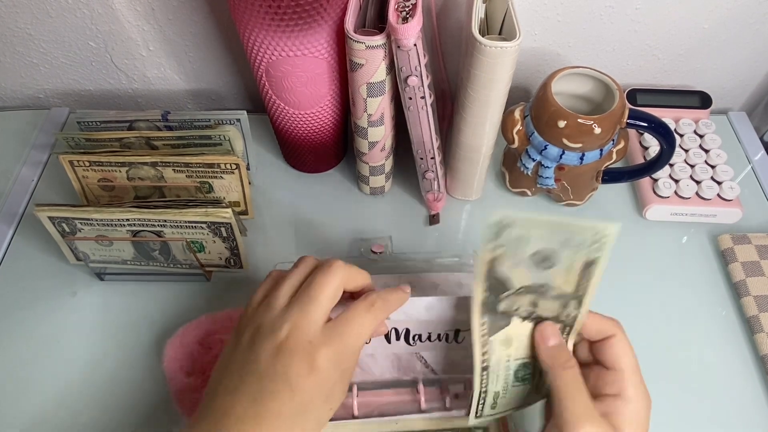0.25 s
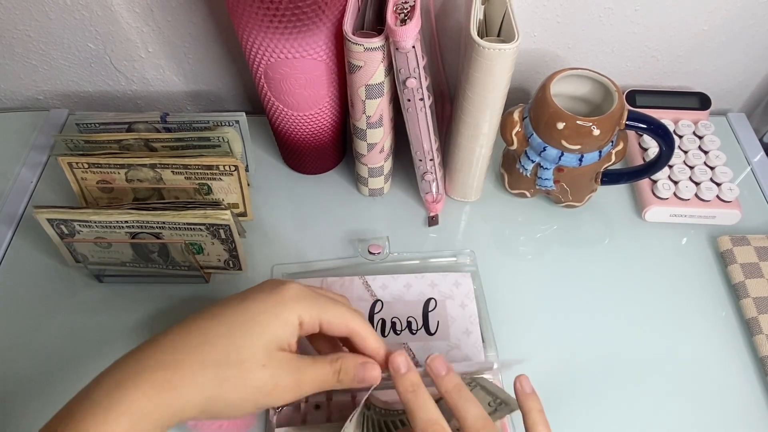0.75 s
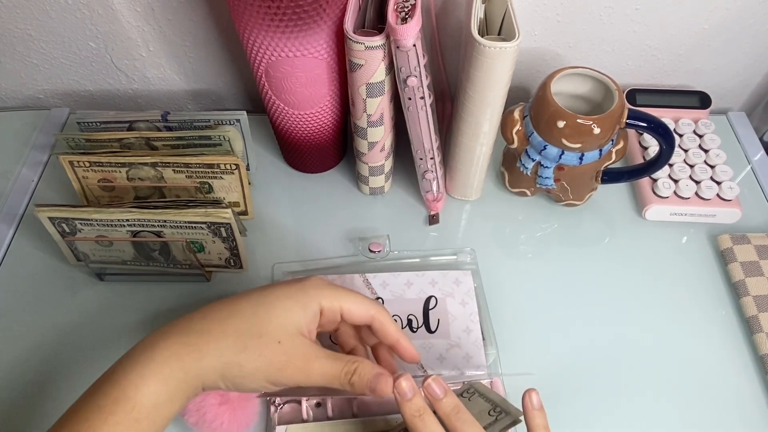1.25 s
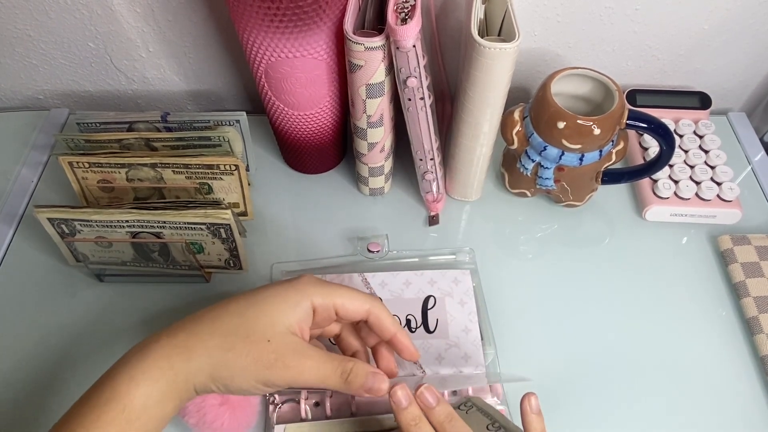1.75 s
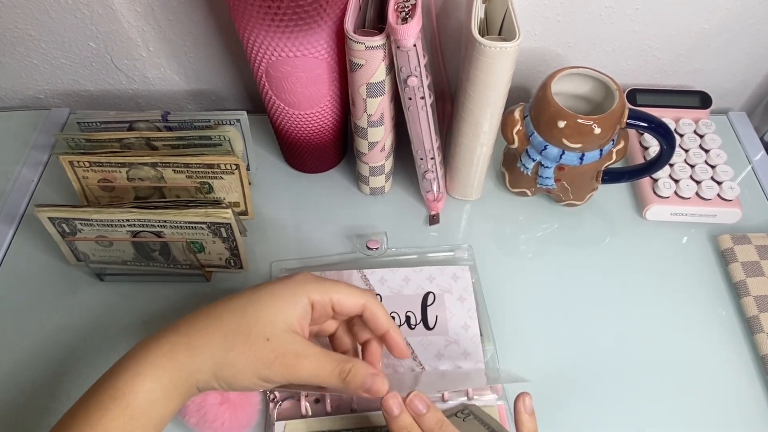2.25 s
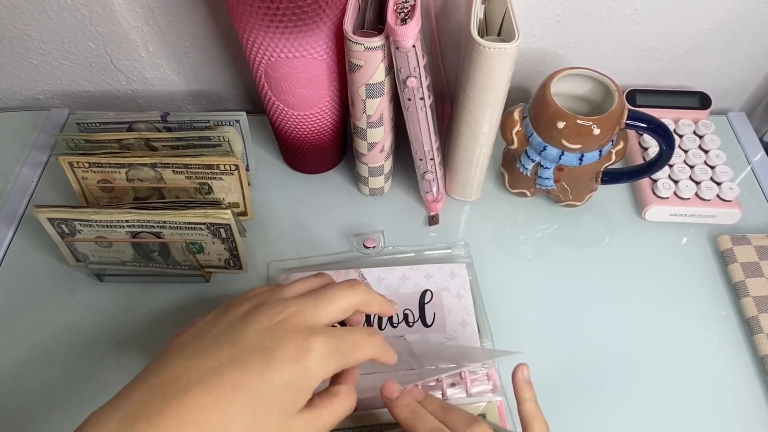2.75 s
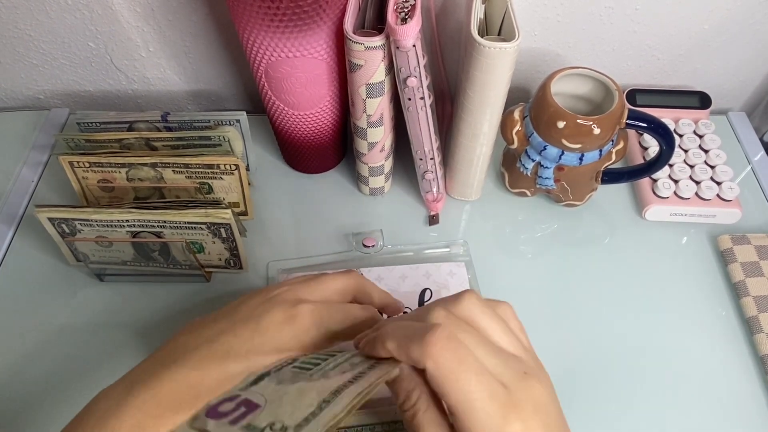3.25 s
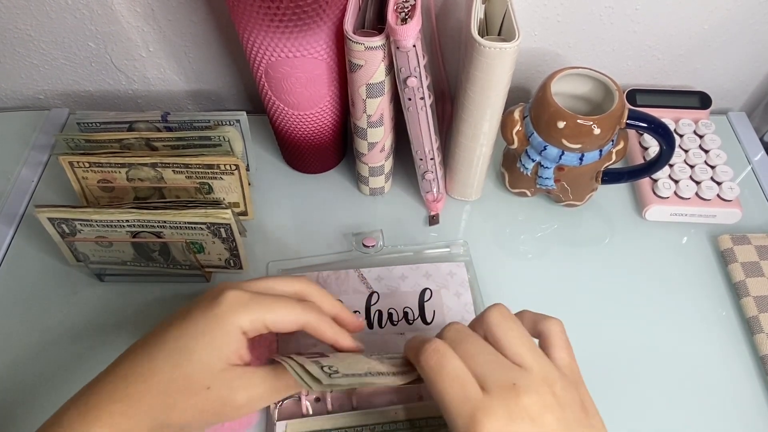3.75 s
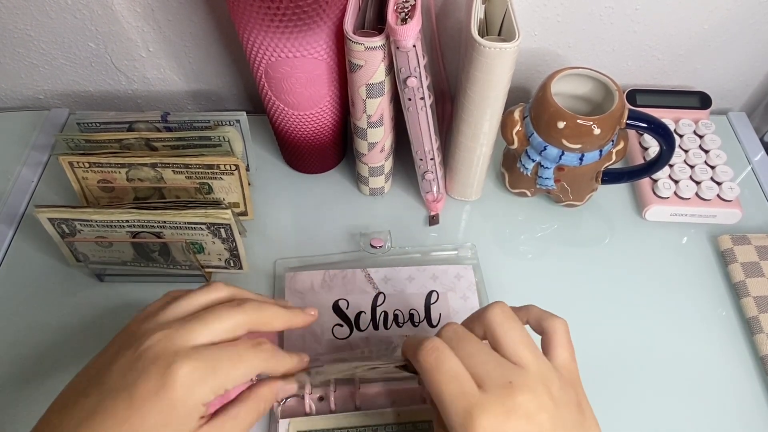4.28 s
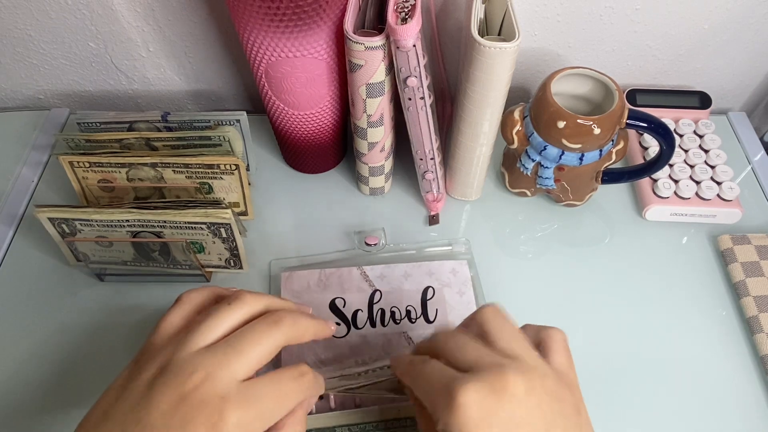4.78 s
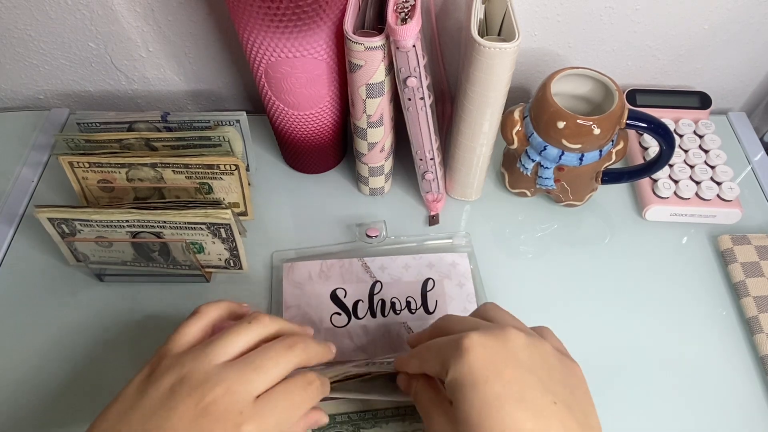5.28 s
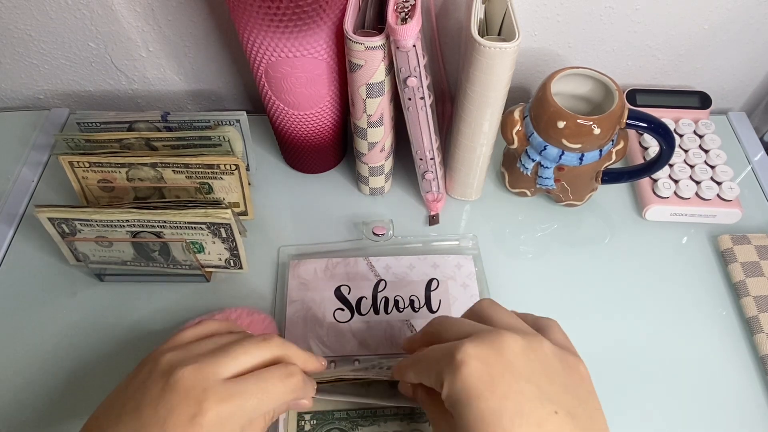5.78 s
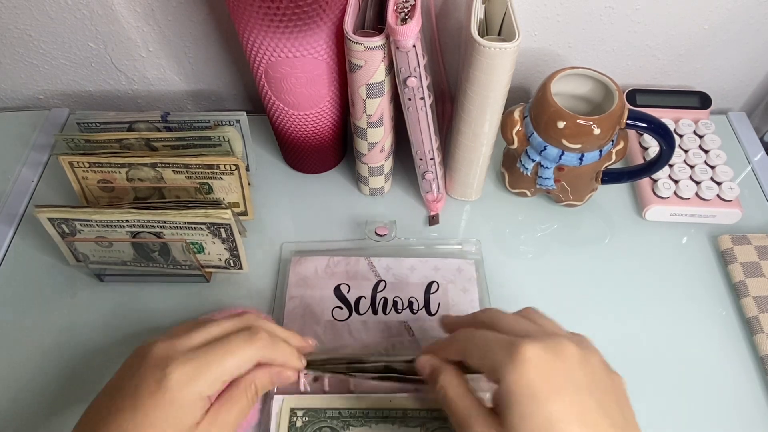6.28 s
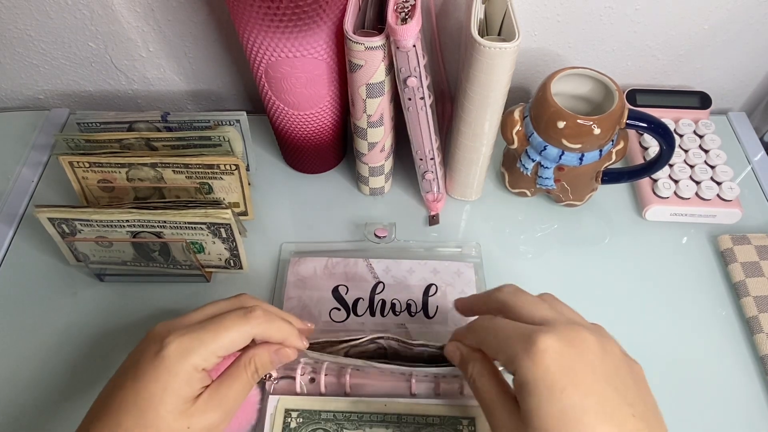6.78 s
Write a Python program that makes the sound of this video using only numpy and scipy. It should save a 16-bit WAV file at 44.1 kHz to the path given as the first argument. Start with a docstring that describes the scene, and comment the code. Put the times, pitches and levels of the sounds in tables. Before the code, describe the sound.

Paper banknotes and a stiff plastic binder pouch are handled softly, close to the microphone, over the steady low rumble of a small room. Light rubbing and a couple of dull bumps open the sound, followed by a crisp flurry of crinkling and sliding paper from about 0.5 to 1 second. It then goes quieter, with only faint ticks and rubs, until a click and a knock on the desk at around 2.5 seconds. Rustling builds again, with a bright snap near 3.4 seconds and a hissing slide of paper until about 4. Scattered crinkles lead to sharp clicks and taps at around 4.8 seconds, then gentle rubbing. From about 5.8 to 6.6 seconds the pouch crackles repeatedly while the binder knocks dully on the desk. A faint rustle closes it at around 7 seconds.

```python
"""Over the low rumble of a small room, paper rubs and hisses: hands slide banknotes into the stiff
plastic pouch of a ring binder on a glass desk. Sheet-on-sheet friction is noise and tiny slips,
coloured by paper and pouch. Creases snap in short bursts. Fingers and pouch jolt the binder, which
knocks dully on the desk. Two microphone ports above the desk hear it, differing in phase and level."""
import sys
import numpy as np
from scipy import signal
from scipy.fft import rfft, irfft, next_fast_len
from scipy.io import wavfile

SR = 44100
rng = np.random.default_rng(int(sys.argv[2]) if len(sys.argv) > 2 else 0)


def file_out(sig):
    """Save sig as 16-bit WAV at sys.argv[1]."""
    # one column per channel
    cols = np.atleast_2d(sig).T
    # limit, then scale
    lim = np.clip(cols, -1, 1)
    pcm = np.round(lim * 32767).astype(np.int16)
    wavfile.write(sys.argv[1], SR, pcm)


N = 310023

# Building rumble. Each row: frequency in Hz, relative spectral density in dB.
RUMBLE_SPECTRUM = [(15, -35), (28, -12.5), (45, -5), (66, 4.5), (85, 0), (130, -1), (165, -18.5),
                   (225, -17), (300, -31.5), (1100, -40.5), (1400, -103.5), (4500, -61.5), (9500, -59.5),
                   (13000, -98), (16000, -93.5)]
# Strokes of sheet on sheet. Each row: time of full pressure in seconds, swell in seconds,
# hold in seconds, scrape level in dB, hiss over scrape in dB, open pocket's resonance in Hz.
SHEET_STROKES = [(0.018, 0.018, 0.023, -54.5, -4, 1270), (0.097, 0.067, .03, -59, -11, 1260),
                 (0.188, 0.052, .04, -61, -14, 2260), (0.3, 0.15, 0.12, -59, -12.5, 1200),
                 (0.465, 0.2, 0.089, -58, 6.5, 3500), (0.542, 0.058, 0.11, -52.5, 2, 2930),
                 (0.645, 0.036, 0.086, -54, -3.5, 2920), (0.751, 0.057, 0.045, -57, -11, 1100),
                 (0.854, 0.11, 0.061, -68.5, -2, 2400), (0.994, 0.0092, .015, -57.5, -4, 2480),
                 (1.127, 0.027, 0.035, -70, 0, 1010), (1.275, 0.068, 0.1, -66.5, -9, 2090),
                 (1.468, 0.032, 0.019, -76.5, 0, 1900), (1.672, 0.11, 0.025, -65, -14.5, 1000),
                 (1.793, 0.015, 0.013, -64.5, -14.5, 1040), (1.87, 0.027, 0.014, -67, -19, 1210),
                 (2.059, 0.0084, 0.0067, -57, -9.5, 1080), (2.182, 0.02, 0.0084, -61.5, -13, 1100),
                 (2.252, 0.018, 0.0061, -66.5, -1.5, 1230), (2.372, 0.023, 0.035, -65.5, -10.5, 1270),
                 (2.434, 0.011, 0.0083, -43.5, -7, 1070), (2.648, 0.1, 0.041, -59, -11.5, 1090),
                 (2.768, 0.088, 0.014, -54, -10.5, 1150), (2.889, 0.047, 0.1, -53.5, -6, 2310),
                 (3.017, 0.039, 0.01, -51, 3.5, 3230), (3.173, 0.026, 0.11, -75, -18, 1180),
                 (3.267, .015, 0.0073, -68, 2, 3000), (3.331, 0.052, .03, -61, 9.5, 5350),
                 (3.383, 0.076, 0.091, -57, -3.5, 2660), (3.503, 0.051, 0.4, -56, 0.5, 3500),
                 (3.836, 0.11, 0.0073, -48.5, -6, 2300), (3.999, 0.02, 0.0062, -53, 2.5, 3780),
                 (4.126, 0.11, 0.049, -55.5, -2.5, 2020), (4.288, .09, .01, -50.5, -2.5, 2800),
                 (4.399, 0.023, 0.13, -67, 3.5, 2620), (4.551, 0.052, 0.054, -52, -10, 1130),
                 (4.718, 0.21, 0.015, -57, -14, 2570), (4.765, 0.0058, 0.0035, -37.5, -19, 1200),
                 (4.809, 0.013, 0.0042, -50.5, 4.5, 3000), (4.833, 0.022, 0.0027, -45, -25.5, 3010),
                 (5.072, 0.3, 0.061, -62, -3, 1180), (5.156, 0.033, 0.017, -57, -6, 1250),
                 (5.326, 0.3, 0.015, -59.5, -11.5, 3170), (5.41, 0.11, 0.17, -64, -6, 2000),
                 (5.66, 0.11, 0.12, -65, -9, 1710), (5.819, .008, 0.052, -60.5, -13, 1360),
                 (5.997, 0.13, 0.012, -57, -1.5, 1720), (6.023, 0.018, 0.053, -54.5, -20.5, 1300),
                 (6.134, 0.037, 0.047, -57.5, -4.5, 1630), (6.207, 0.053, 0.027, -42, -5.5, 1230),
                 (6.292, 0.033, 0.05, -58.5, 1, 1340), (6.393, 0.097, 0.024, -56.5, -11, 1650),
                 (6.447, .008, 0.036, -52.5, -11, 1400), (6.569, 0.0078, 0.04, -47.5, -15, 2630),
                 (6.83, 0.18, 0.035, -64.5, -0.5, 4100), (7.024, 0.036, .02, -60.5, -13, 2240)]
# Friction ranges. Each list: drag, scrape, hiss.
FRICTION_ANCHOR_HZ = [428, 1765, 7070]
FRICTION_RELEASE_DB_PER_S = [181, 269.5, 277]
FRICTION_REST_DB = [-76, -86, -87]
# Pouch resonances. Each row: centre in Hz, width in Hz, gain in dB.
POUCH_RESONANCES = [(565, 57, 8), (1182, 115, 4.5), (1660, 50, 3), (2380, 520, 9), (3540, 510, 0),
                    (4840, 190, -2.5)]
# Colour of the sheets. Each row: frequency in Hz, gain in dB.
SHEET_SPECTRUM = [(180, 16), (300, 9.5), (900, 4.5), (2500, -4.5), (5000, 2.5), (7500, 0), (10000, -2),
                  (12000, -14.5), (13500, -26), (16000, -4)]
# Snapping creases. Each row: start in seconds, level in dB, ring in Hz, crispness in dB,
# left over right in dB, decay rate in dB relative to a rate of 1 dB/ms.
CREASE_SNAPS = [(0.015, -39.5, 1300, 1, 0, 20), (0.278, -52, 850, -24, 7, 4),
                (0.298, -40.5, 830, -1, 1.5, 2), (0.307, -48, 1100, -24, 4, 3),
                (0.342, -48.5, 2380, -16, 0, 6), (0.473, -44, 3660, 17, 0, 9),
                (0.499, -33.5, 5000, -21, -1, 9), (0.505, -33.5, 2320, 4, 3, 11),
                (0.546, -25, 2830, 18, 0, 12), (0.555, -28.5, 3770, -25, 0, 12),
                (0.564, -34.5, 3700, -17, -3, 9), (0.6, -36, 2400, -9, 0, 4),
                (0.644, -20, 1170, 4.5, 0, 15.5), (0.682, -32, 1210, 2, 1, -4),
                (0.727, -34, 2940, -19, -2, 22.5), (0.901, -48, 1050, -11, 1, 4),
                (0.986, -32.5, 2480, 13, 0.5, 7), (1.106, -42, 940, 11, 2, 13),
                (1.145, -55.5, 1030, -25, 2, 7), (1.283, -55, 1230, -31, 4, 8),
                (1.342, -47.5, 1370, -7, 3, 6), (1.436, -64, 902, 3, 9, 14),
                (1.471, -50.5, 1790, -5.5, 4, 8), (1.668, -58, 1000, -18, 3, 3),
                (1.793, -58, 1070, -32, 6, 9), (1.868, -50.5, 1240, 9, 0, 10),
                (1.971, -53.5, 1340, -56, 8, 19), (2.061, -42.5, 1030, 8, 5.5, 4),
                (2.186, -57, 1050, -3, 2, 1), (2.221, -54.5, 972, 4, 0, 7),
                (2.257, -47.5, 1220, 6.5, 6.5, 0), (2.366, -51, 1280, -7, 6, 8),
                (2.424, -55, 2530, -15, -5, 5), (2.433, -37, 1480, -4, -2, 1),
                (2.46, -34.5, 1020, -24, 3, 4), (2.637, -35, 1060, 8.5, 2, 0), (2.688, -45, 1120, -6, 2, 7),
                (2.712, -46, 1110, -53, 5, 10), (2.781, -42.5, 1150, -5, 3, 4),
                (2.866, -44.5, 900, -4, -1, 8), (2.907, -46, 1060, -11, 0, 11),
                (3.021, -38, 3170, -26, -2, 4), (3.172, -46, 1120, -18, 2, 13),
                (3.235, -48.5, 1020, -42, 4, 9), (3.258, -50.5, 1110, 7, 0, -2),
                (3.312, -43, 6200, -32, 1, 11), (3.324, -39.5, 5460, 34, -13, 9),
                (3.355, -21, 5370, 13, -1, 13), (3.521, -36, 3740, -9, -5, 17),
                (3.752, -43.5, 2160, -15, 0, 6), (3.779, -42, 2290, -8, -5, 5),
                (3.841, -37, 2440, -11, -7, 9), (4.012, -40, 3650, -13, 0, 9),
                (4.129, -48, 2420, -15, -4, 7), (4.17, -51, 2080, -9, -3, 13),
                (4.397, -50.5, 2560, -19, 0, 8), (4.54, -41.5, 1270, -3, -1, 12),
                (4.67, -47.5, 2110, -5, 0, 12), (4.695, -51, 2080, -16, -10, 12),
                (4.745, -39, 3230, 2, 0, 8), (4.764, -32.5, 3160, -39, 2, 17),
                (4.768, -23.5, 1320, -55, -1, 4), (4.833, -24.5, 3100, -44, -4, 13),
                (5.152, -38.5, 1320, -9.5, 2, 7), (5.286, -47, 1600, -10, 2, 8),
                (5.322, -41.5, 3030, -38, -3, 13), (5.657, -54.5, 1290, -18, 0, 7),
                (5.825, -44, 1370, -22, 2, 14), (5.86, -37.5, 1240, -43, 1.5, 10),
                (5.917, -41, 1260, -9, 0, 7), (6.025, -38, 1310, -30, 0, 6), (6.06, -44, 1100, -5, 0, 5),
                (6.124, -52, 1660, -2, 0, 4), (6.199, -33, 1670, -15, 3, 14),
                (6.204, -28, 1310, -28, -1, 0), (6.226, -25.5, 884, -6, -3, 19),
                (6.315, -43.5, 1220, -24, 1, 4), (6.434, -29.5, 1340, -12, 1.5, 9),
                (6.465, -51, 2220, -20, 0, 4), (6.568, -25.5, 2440, -17, 0, 12.5),
                (6.945, -55.5, 1620, -35.5, 1, 16), (7.02, -57, 845, -17, -4, 5)]
# Jolts of the binder. Each row: start in seconds, level in dB, hardness as tilt in dB per octave,
# gain of the cover's hollow ring in dB.
BINDER_KNOCKS = [(0.017, -60, 1, -3), (0.3, -40.5, 3, -5), (0.348, -42, 3, -4), (0.471, -49.5, 12, 5),
                 (0.504, -47.5, 13, -1), (0.562, -52.5, 16, 5), (0.684, -46.5, 2.0, 6),
                 (0.764, -34.5, 3.5, -4), (0.989, -43.5, 1, 1.5), (1.284, -66, 2.0, 15),
                 (2.067, -56, -1, -2), (2.432, -57, 0, -3), (2.457, -47, 10, -9), (2.478, -34.5, -2, -5),
                 (2.641, -54, -4, -4), (3.354, -49, 16, 3), (3.78, -48.5, -4.5, 2), (3.821, -41.5, 11, -3),
                 (4.101, -40.5, 6.5, -5), (4.261, -52, -3, 0), (4.31, -47.5, -5, 2),
                 (4.549, -48.5, -2, 7.5), (4.768, -37.5, 11, -2), (4.84, -38.5, 9, 1.5),
                 (4.858, -38.5, 5, 0), (5.322, -53.5, -2, 0), (5.829, -41, -1, 8.5), (5.864, -36, 11, 7),
                 (5.919, -38, 6, 4.5), (6.025, -34, 6, 3.5), (6.048, -45, -6, 6), (6.206, -32.5, 8, -4),
                 (6.227, -32.5, -5.5, 11.5), (6.323, -58, 8, 8), (6.433, -38.5, 1, 4), (6.572, -35, 11, -6),
                 (6.658, -47.5, 4, 1)]
# Binder modes. Each row: frequency in Hz, relative level in dB, T60 in seconds.
BINDER_MODES = [(231, -1, 0.086), (270, -9.5, 0.022), (343.7, -0.5, 0.071), (379, -1.5, 0.087),
                (477.4, -2, 0.086), (543.2, 0.5, 0.088), (640, -2, 0.041), (713, -6, 0.08),
                (809, -0.5, 0.036)]
# Phase between the ports. Each row: frequency in Hz, lead of the left in radians.
PORT_LEAD = [(0, 0), (150, -0.12), (690, -1.2), (1720, -0.0), (2500, 0.6), (5250, 0.6), (6980, 2.9),
             (8010, 3.7), (9820, 5.9), (11500, 6.8), (12500, 9.2), (14400, 9.5), (15500, 12.4)]
# Balance of the ports. Each row: frequency in Hz, left over right in dB.
PORT_LEVEL = [(60, 0.0), (130, 0.5), (290, 2.0), (640, 2.5), (1410, 3.0), (3100, -0.5), (6820, -1.0),
              (15000, 0.0)]


def from_db(db):
    return 10 ** (np.asarray(db) / 20)


def unit_rms(x):
    return x / np.sqrt(np.mean(x ** 2) + 1e-20)


def at_hz(points, hz):
    points_hz, values = np.transpose(points)
    return np.interp(np.log(hz), np.log(points_hz), values)


def butter(x, hz, kind="low", order=2):
    return signal.sosfilt(signal.butter(order, hz, kind, fs=SR, output="sos"), x)


def band_coeffs(hz, width_hz):
    """Two-pole band-pass, peak gain 1."""
    r = np.exp(-np.pi * width_hz / SR)
    return np.array([1, 0, -1]) * (1 - r * r) / 2, [1, -2 * r * np.cos(2 * np.pi * hz / SR), r * r]


def resonance(x, hz, width_hz):
    return signal.lfilter(*band_coeffs(hz, width_hz), x)


def coloured(x, spectrum):
    size = next_fast_len(x.shape[-1])
    hz = np.maximum(np.arange(size // 2 + 1) * SR / size, 1)
    return irfft(rfft(x, size) * from_db(at_hz(spectrum, hz)), size)[..., :x.shape[-1]]


def drift(corner_hz, step=40):
    """Slow random wander, RMS 1."""
    r = np.exp(-2 * np.pi * corner_hz * step / SR)
    slow = signal.lfilter([1], [1, -2 * r, r * r], rng.standard_normal(N // step + 2002))[2000:]
    return np.interp(np.arange(N) / step, np.arange(len(slow)), unit_rms(slow))


def building_rumble(level_db=-50.5, side_db=-12, side_cut_hz=250):
    """Steady low noise, nearly the same at both ports."""
    mid, side = coloured(rng.standard_normal((2, N)), RUMBLE_SPECTRUM)
    side = from_db(side_db) * butter(side, side_cut_hz, "high")
    return from_db(level_db) * unit_rms(mid + side * [[1], [-1]])


def sheet_colour(x):
    """Paper and pouch shape the sound with broad resonances."""
    peaks = sum((from_db(db) - 1) * resonance(x, hz, width_hz) for hz, width_hz, db in POUCH_RESONANCES)
    return coloured(x + peaks, SHEET_SPECTRUM)


def stroke_levels(swell_db=27, drag_db=-7, drag_per_hiss=-0.3):
    """Drag, scrape and hiss in dB on a 1 ms grid: each stroke swells, holds, releases."""
    full_s, swell_s, hold_s, scrape_db, hiss_db, _ = np.transpose(SHEET_STROKES)[:, :, None]
    grid_s = np.arange(N * 1000 // SR + 2) / 1000
    swell_left = np.maximum(full_s - grid_s, 0) / swell_s
    released_s = np.maximum(grid_s - full_s - hold_s, 0)
    # Bright strokes drag less.
    tops_db = scrape_db + drag_db + drag_per_hiss * hiss_db, scrape_db, scrape_db + hiss_db
    levels_db = []
    for top_db, fall_db_per_s, rest_db in zip(tops_db, FRICTION_RELEASE_DB_PER_S, FRICTION_REST_DB):
        strokes = from_db(top_db - swell_db * swell_left - fall_db_per_s * released_s)
        levels_db.append(10 * np.log10(np.sum(strokes ** 2, axis=0) + from_db(rest_db) ** 2))
    return grid_s, levels_db


def pocket_resonance(x, q=8.0, block=256):
    """A resonance whose centre follows the opening of the pocket."""
    full_s, *_, pocket_hz = np.transpose(SHEET_STROKES)
    out, state = np.zeros(N), np.zeros(2)
    for i in range(0, N, block):
        hz = np.exp(np.interp(i / SR, full_s, np.log(pocket_hz)))
        out[i:i + block], state = signal.lfilter(*band_coeffs(hz, hz / q), x[i:i + block], zi=state)
    return out


def sheet_friction(slips_per_s=1500, slip_spread_db=2.0, slip_gain=0.51,
                   patchy_db=3.0, flutter_db=2.05, pocket_db=-5, side_db=-10):
    """Smooth noise and tiny slips; each third octave wanders alone, on top of a shared flutter."""
    grid_s, levels_db = stroke_levels()
    sizes = from_db(slip_spread_db * np.minimum(rng.exponential(1, (2, N)), 5))
    signs = rng.choice([-1, 1], (2, N))
    slips = unit_rms(sizes * signs * (rng.random((2, N)) < slips_per_s / SR))
    rubs = sheet_colour(rng.standard_normal((2, N)) + slip_gain * slips)[:, None]
    # Broad contact: the ports differ a little.
    rubs = rubs + from_db(side_db) * np.roll(rubs, N // 2, axis=-1) * [[1], [-1]]
    edges_hz = 180 * 2 ** np.arange(0, 6.7, 1 / 3)
    flutter, out = drift(corner_hz=35), 0
    for k, (low_hz, high_hz) in enumerate(zip(edges_hz, edges_hz[1:])):
        place = np.interp(np.log(low_hz * high_hz) / 2, np.log(FRICTION_ANCHOR_HZ), [0, 1, 2])
        below = min(int(place), 1)
        grid_db = levels_db[below] + (place - below) * (levels_db[below + 1] - levels_db[below])
        stroke_db = np.interp(np.arange(N) / SR, grid_s, grid_db)
        band = butter(rubs[k % 2], [low_hz, high_hz], "band")  # neighbours use independent noise
        out = out + band * from_db(stroke_db + patchy_db * drift(corner_hz=11.2) + flutter_db * flutter)
    return out + from_db(pocket_db) * pocket_resonance(out.mean(axis=0))


def crease_snaps(wide_q=0.98, narrow_q=3.3, broad_db=-12, rise_ms=0.21, trim_db=-0.5,
                 crackle_db=2.5, crackle_per_crisp=0.48, top_db=7, top_fall_db_per_ms=1,
                 rustle_db=-19.5, rustle_t60_ms=100):
    """Each crease gives a burst (ring, crackle, crisp top); the sheet settles with a slower rustle."""
    length = SR // 10
    ms = np.arange(length) / SR * 1000
    out = np.zeros((2, N + length))
    for start_s, level_db, hz, crisp_db, pan_db, damping_db in CREASE_SNAPS:
        decay = from_db(-ms * from_db(damping_db))
        rustle = from_db(rustle_db - 60 * ms / rustle_t60_ms)
        burst = rng.standard_normal(length) * (decay + rustle) * (1 - np.exp(-ms / rise_ms))
        ring = unit_rms(resonance(resonance(burst, hz, hz / wide_q), hz, hz / narrow_q))
        ring += from_db(broad_db) * unit_rms(resonance(burst, hz, hz))
        crackle = unit_rms(butter(burst, [1900, 5000], "band"))
        crackle *= from_db(crackle_db + crackle_per_crisp * crisp_db)
        top = unit_rms(butter(burst * from_db(-ms * top_fall_db_per_ms), 5000, "high"))
        snap = sheet_colour(ring + crackle + from_db(top_db + crisp_db) * top)
        gains = from_db(level_db + trim_db + pan_db * np.array([[.5], [-.5]]))
        at = round(start_s * SR)
        out[:, at:at + length] += gains * snap / np.abs(snap).max()
    return out[:, :N]


def ringing(clicks, hz, t60_s):
    """A unit click starts a decaying sine of height 1."""
    r, w = from_db(-60 / (t60_s * SR)), 2 * np.pi * hz / SR
    return signal.lfilter([0, np.sin(w)], [1, -2 * r * np.cos(w), r * r], clicks)


def binder_knocks(ring_db=-6, spread_db=1.94, hollow_hz=533, hollow_octaves=0.38,
                  pivot_hz=540, contact_hz=900, trim_db=-2.0):
    """Each knock is a soft push: a short thud plus modes; harder knocks favour the upper ones."""
    start_s, knock_db, tilt_db_per_octave, hollow_db = np.transpose(BINDER_KNOCKS)
    at = np.round(start_s * SR).astype(int)
    scatter_db = spread_db * rng.standard_normal((len(at), len(BINDER_MODES)))
    clicks = np.full(N, 1e-18)
    clicks[at] = from_db(knock_db)
    out = ringing(clicks, hz=385.3, t60_s=0.045)  # thud
    for k, (hz, mode_db, t60_s) in enumerate(BINDER_MODES):
        hollow_share = np.exp(-(np.log2(hz / hollow_hz) / hollow_octaves) ** 2)
        colour_db = hollow_db * hollow_share + tilt_db_per_octave * np.log2(hz / pivot_hz)
        clicks[at] = from_db(knock_db + ring_db + mode_db + colour_db + scatter_db[:, k])
        out += ringing(clicks, hz, t60_s) * (-1) ** k
    return from_db(trim_db) * butter(out, contact_hz)


def room_echoes(x, level_db=-11.5, t60_s=0.25, build_s=0.0016, wall_cut_hz=4000):
    """Dense echoes, different at each port; their treble dies twice as fast."""
    t = np.arange(SR // 2) / SR
    noise = rng.standard_normal((2, len(t))) * (1 - np.exp(-t / build_s))
    low = butter(noise, wall_cut_hz, order=1)
    decay = from_db(-60 * t / t60_s)
    response = low * decay + (noise - low) * decay ** 2
    response /= np.sqrt(np.sum(response ** 2, axis=1, keepdims=True))
    return from_db(level_db) * signal.fftconvolve(x[None], response, axes=1)[:, :N]


def scene():
    """Sounds at the desk, their echoes and the rumble."""
    desk = sheet_friction() + crease_snaps() + binder_knocks()
    return desk + room_echoes(desk.mean(axis=0)) + building_rumble()


def record(dry):
    """The two ports differ in phase and level by frequency; the top is cut."""
    stop_db, stop_hz = 70, 15800
    size = next_fast_len(N + 2000)
    hz = np.arange(size // 2 + 1) * SR / size
    lead_rad = np.interp(hz, *np.transpose(PORT_LEAD))
    balance_db = at_hz(PORT_LEVEL, np.maximum(hz, 1))
    left_gain = from_db(balance_db / 2) * np.exp(.5j * lead_rad)
    ports = irfft(rfft(dry, size) * [left_gain, 1 / left_gain], size)[:, :N]
    return signal.sosfilt(signal.cheby2(12, stop_db, stop_hz, fs=SR, output="sos"), ports)


dry = scene()
out = record(dry)
file_out(out)
```